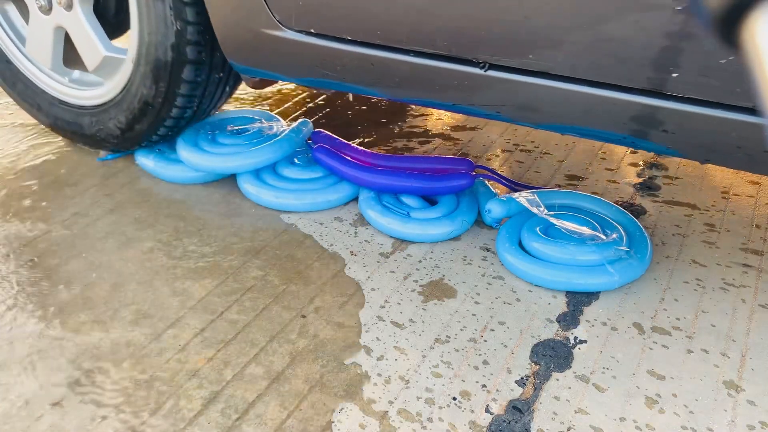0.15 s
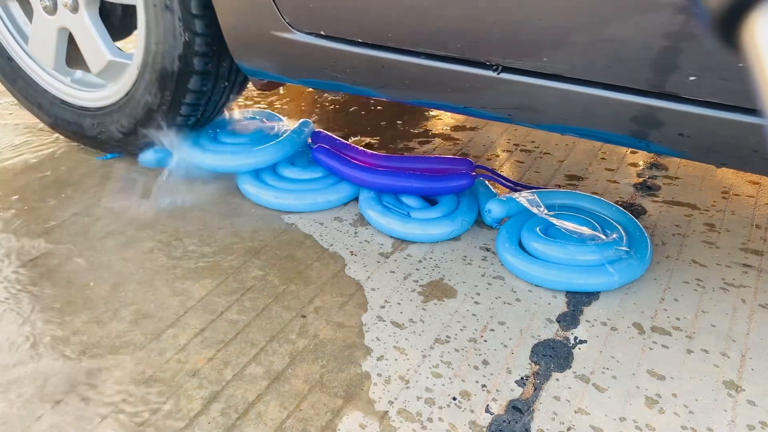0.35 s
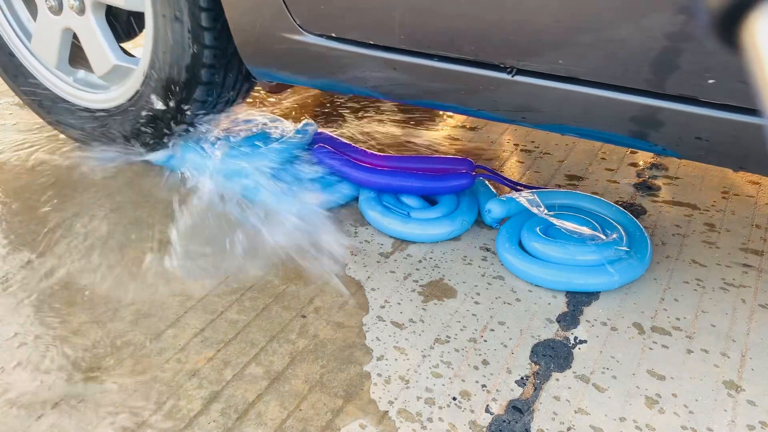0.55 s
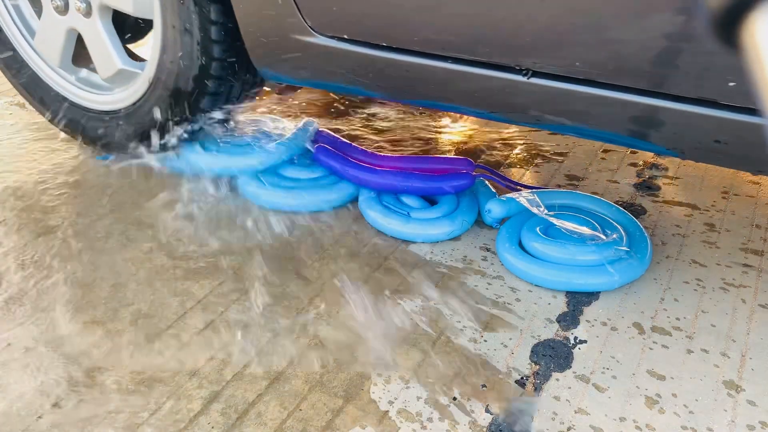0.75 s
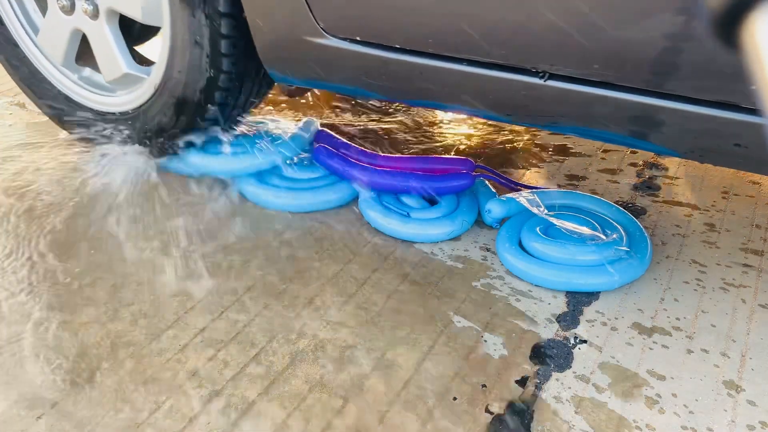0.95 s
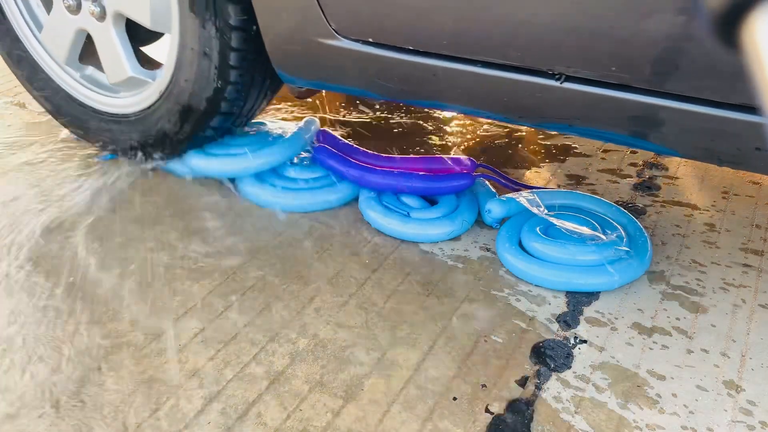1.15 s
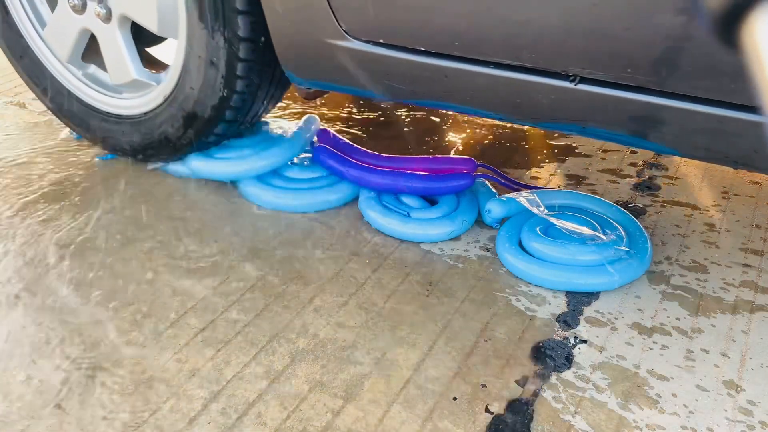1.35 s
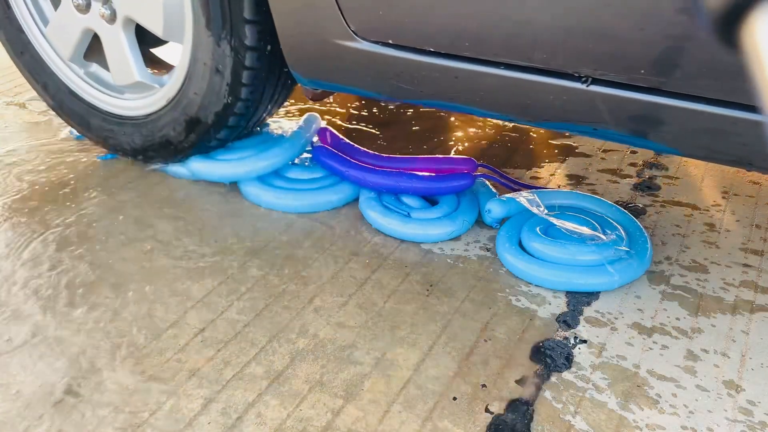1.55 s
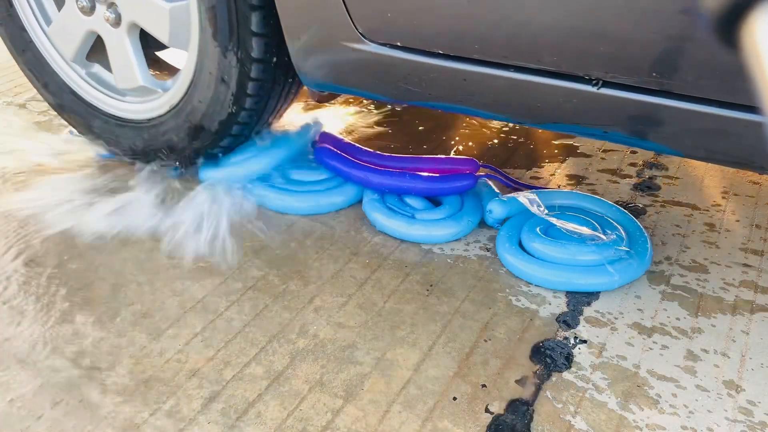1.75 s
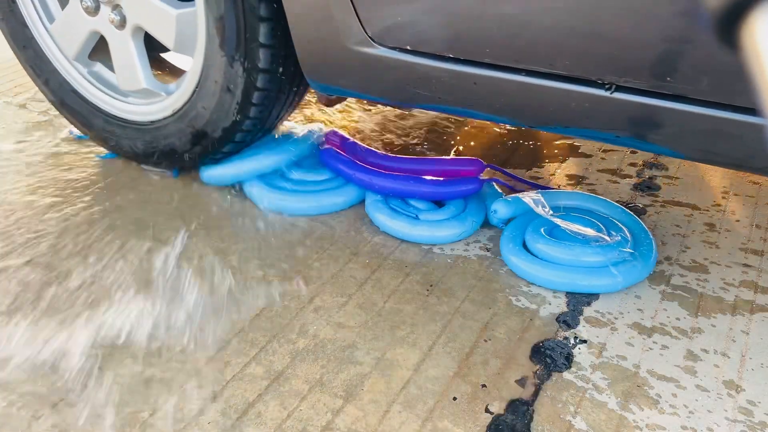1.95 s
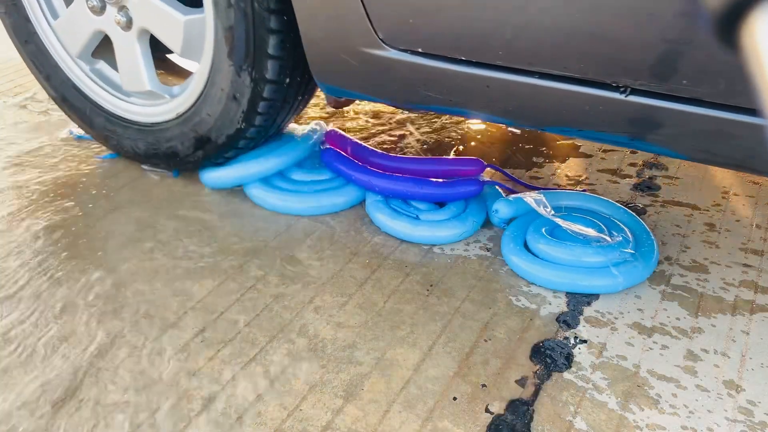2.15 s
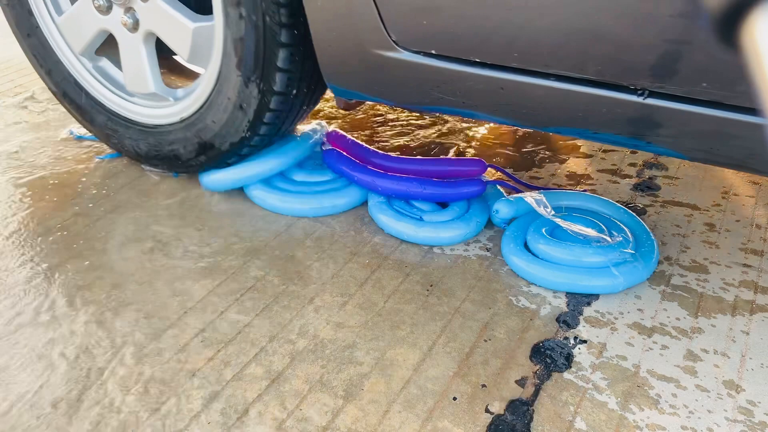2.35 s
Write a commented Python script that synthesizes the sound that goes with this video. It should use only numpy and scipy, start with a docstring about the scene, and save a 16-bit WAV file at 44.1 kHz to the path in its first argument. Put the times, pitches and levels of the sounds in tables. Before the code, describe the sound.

Water balloons burst under a slowly rolling car tire: a sharp loud pop and splash, pattering spray and drops, rubber creaking, then a softer, wetter crackling burst with gulps and a low thump; outdoors on wet concrete, close stereo microphone.

```python
"""Low rumble, faint spray and slosh, and single drops open the scene as a car tyre rolls slowly over coiled
water balloons on wet concrete. Two balloons burst: noise cracks ring damped skin tones, and noise gushes out.
Spray and slosh are dense damped sines over hiss; drops tick and ring, gulps ring with rising pitch.
Rubber creaks in rough noise puffs before the second burst; a low sine thumps after it.
A two-port microphone listens close by."""
import sys
import numpy as np
from scipy.fft import rfft, irfft, next_fast_len
from scipy.io import wavfile
from scipy.ndimage import map_coordinates

SR = 44100
rng = np.random.default_rng(int(sys.argv[2]) if len(sys.argv) > 2 else 0)


def to_wav(sig):
    """Store sig (one row per channel, or 1-D mono) as 16-bit WAV at the path in sys.argv[1].

    Samples outside -1..1 are clipped; the rate is SR.
    """
    pcm = np.clip(np.atleast_2d(sig), -1, 1) * 32767
    pcm = np.round(pcm).astype(np.int16)
    wavfile.write(sys.argv[1], SR, pcm.T)  # frames by channels


N = 105840
T = np.arange(N) / SR  # s
CREST_DB = 6  # nominal peak over rms of a noise puff

# cracks of splitting rubber: start_s, crack_peak_db, body_peak_db, pitch_share (of the full skin's)
CRACK_EVENTS = [(.2414, -2, -2, 1), (1.5578, -14, -32, 1), (1.5735, -17, -18, .6), (1.5828, -11, -12, .47),
                (1.5892, -11, -15, .7)]
# spectrum of spray and drop ticks: freq_hz, level_db
SPRAY_SPECTRUM = [(700, -23), (1400, -7), (2200, -3), (3300, -11), (4600, -4), (6200, -4.5), (7200, -8.5),
                  (9500, -15), (9750, -59)]
# spectrum of slosh and gush bass: freq_hz, level_db
SLOSH_SPECTRUM = [(90, -11.5), (200, -3.5), (500, -5.5), (1100, 1), (1600, -6), (3000, -22), (6000, -50),
                  (9500, -79)]


def amp(db):
    """Decibels to linear gain."""
    return 10 ** (np.asarray(db) / 20)


def unit(x):
    """Scale to an rms of 1."""
    return x / np.sqrt(np.mean(x ** 2) + 1e-20)


def along(points, hz):
    """Interpolate (freq_hz, value) points on a log frequency axis."""
    f, v = np.transpose(points)
    return np.interp(np.log(hz + 1), np.log(f + 1), v)


def level(rows):
    """Gain per sample from (time_s, level_db) rows."""
    return amp(np.interp(T, *np.transpose(rows)))


def wobble(rate_hz):
    """Smooth random curve through rate_hz knots a second."""
    knots = rng.standard_normal(int(N * rate_hz / SR) + 4)
    return map_coordinates(knots, [T * rate_hz])


def filtered(x, response):
    """Multiply the spectrum of x by a complex response of frequency."""
    size = next_fast_len(N + SR // 2)
    hz = np.fft.rfftfreq(size, 1 / SR)
    return irfft(rfft(x, size) * response(hz), size)[..., :N]


def coloured(x, colour):
    """Filter x by a (freq_hz, level_db) curve, to unit rms."""
    return unit(filtered(x, lambda hz: amp(along(colour, hz))))


def noise(colour):
    """Two unrelated noises of one colour."""
    return coloured(rng.standard_normal((2, N)), colour)


def shape(start_s, rise_s, hold_s, t60_s):
    """Linear attack, hold and exponential release."""
    t = T - start_s
    attack = np.clip(t / rise_s, 0, 1)
    return attack * amp(-60 * np.clip(t - rise_s - hold_s, 0, None) / t60_s)


def ring(start_s, hz, t60_s, rise_s, glide=0):
    """Damped sine whose pitch may climb by 2 * glide, as a share, over its t60."""
    t = np.clip(T - start_s, 0, t60_s)
    turns = hz * t * (1 + glide * t / t60_s)
    return shape(start_s, rise_s, 0, t60_s) * np.sin(2 * np.pi * turns)


def grains(count, hz, octaves, cycles, spread_db, rarest, size):
    """Scattered short damped sines of uneven pitch and strength, in two unrelated streams."""
    u, t = rng.random((count, 3)), np.arange(size) / SR
    turns = hz * 2 ** (octaves * rng.standard_normal((count, 1))) * t
    strength = amp(-spread_db * np.log(u[:, 1:2] + rarest))
    envelope = np.exp(-turns / cycles) * (1 - np.exp(-2 * turns))
    wave = strength * np.sin(2 * np.pi * turns) * envelope
    wave *= np.cos(np.pi / 2 * t / t[-1])  # fade to zero at the grain's end
    at = (u[:, :1] * 2 * N).astype(int) + np.arange(size)
    stream = np.bincount(at.ravel(), wave.ravel(), 2 * N + size)[:2 * N]
    return unit(stream.reshape(2, N))


def rumble():
    """Low rumble: bass noise under a changing level."""
    # time_s, level_db
    rumble_level = [(0.0, -43), (0.11, -41), (0.22, -43.5), (0.24, -42.5), (0.3, -53.5), (1.04, -48),
                    (1.06, -42.5), (1.35, -48.5), (1.45, -41), (1.54, -35.5), (1.6, -34.5), (1.66, -37),
                    (1.7, -34), (1.85, -40), (1.9, -36), (2.07, -42.5), (2.09, -36.5), (2.15, -43),
                    (2.37, -41), (2.4, -47)]
    # freq_hz, level_db
    rumble_spectrum = [(15, -24), (32, 0.5), (50, -3), (75, -12), (130, -17.5), (250, -39), (600, -82)]
    return level(rumble_level) * noise(rumble_spectrum)


def water():
    """Spray of fine drops and slosh of bubbles: many damped sines, each layer over its own hiss."""
    # time_s, level_db
    spray_level = [(0, -51), (.18, -66.5), (.24, -38), (.27, -35), (.33, -39), (.45, -35), (.6, -39.5),
                   (.71, -36.5), (.85, -35.5), (1, -39.5), (1.09, -49.5), (1.22, -55.5), (1.3, -53),
                   (1.54, -52.5), (1.6, -30.5), (1.66, -37), (1.72, -42.5), (1.8, -47), (1.9, -41),
                   (2.05, -40), (2.12, -44.5), (2.25, -48.5), (2.31, -51.5), (2.4, -55)]
    # time_s, level_db
    slosh_level = [(0, -52.5), (.11, -62), (.23, -46.5), (.28, -31), (.4, -40), (.55, -42.5), (.7, -43),
                   (.77, -51), (.81, -41), (.86, -50.5), (1, -53.5), (1.22, -58.5), (1.3, -57), (1.45, -44),
                   (1.55, -48.5), (1.6, -27), (1.66, -35.5), (1.72, -43), (1.8, -50.5), (1.9, -52.5),
                   (2.2, -57.5), (2.4, -53)]
    fine = grains(count=16000, hz=3300, octaves=.7, cycles=4, spread_db=3.3, rarest=.01, size=180)
    spray = coloured(fine + .8 * rng.standard_normal((2, N)), SPRAY_SPECTRUM)
    spray = spray * amp(1.5 * wobble(60))
    bubbles = grains(count=3500, hz=558, octaves=.897, cycles=3, spread_db=3.5, rarest=.02, size=900)
    slosh = unit(bubbles + .9 * noise(SLOSH_SPECTRUM))
    slosh = slosh * amp(1.5 * wobble(45))
    return level(spray_level) * spray + level(slosh_level) * slosh


def drops():
    """Single drops landing: a tick of broad noise with a short ring of slightly rising pitch."""
    # start_s, peak_db, pitch_hz (at the ring's start)
    drop_events = [(0.056, -40, 3370), (0.3725, -24, 2590), (0.769, -30, 3220), (0.8518, -39, 2350),
                   (0.88, -31.5, 2350), (1.1004, -35, 2250), (1.248, -40.5, 5000), (1.355, -39, 6440),
                   (1.4677, -46, 1620), (1.6344, -25.5, 3940), (1.702, -36.5, 5270), (1.7384, -33.5, 4580),
                   (1.8896, -32, 3570), (1.9756, -31, 5550), (2.0343, -33.5, 2260), (2.0707, -25.5, 2130),
                   (2.0767, -25.5, 6200), (2.1665, -38, 4500), (2.2517, -38, 4960), (2.2733, -39, 4900)]
    plink_db = -5  # ring relative to the drop's peak
    puffs = sum(amp(db - CREST_DB) * shape(s, .0011, 0, .035) for s, db, _ in drop_events)
    tick = puffs * noise(SPRAY_SPECTRUM)[0]
    plink = sum(amp(db + plink_db) * ring(s, hz, 22 / hz, .00044, glide=.059)
                for s, db, hz in drop_events)
    return tick + plink


def cracks():
    """Splitting rubber: sharp puffs of coloured noise."""
    # freq_hz, level_db
    crack_spectrum = [(300, -49), (1000, -8.5), (2500, -26), (5000, -3), (6800, -11.5), (8500, -20),
                      (9800, -49), (10600, -56)]
    rise_s, hold_s, t60_s = .0007, .0007, .009
    puffs = sum(amp(db - CREST_DB) * shape(s, rise_s, hold_s, t60_s) for s, db, *_ in CRACK_EVENTS)
    return puffs * noise(crack_spectrum)[0]


def skin():
    """Each crack rings the water-filled skin's modes; a lower pitch share rings longer."""
    # modes at full skin: freq_hz, level_db, t60_s
    skin_modes = [(194, -17, .09), (400, -18, .04), (770, -3, .026), (1110, -3, .017), (1960, -15, .014)]
    lag_s, rise_s = .0014, .0006
    body = np.zeros(N)
    for s, _, db, share in CRACK_EVENTS:
        for hz, mode_db, t60_s in skin_modes:
            gain = amp(db + mode_db + rng.normal(0, 1))
            pitch_hz = hz * share * rng.normal(1, .033)
            body += gain * ring(s + lag_s, pitch_hz, t60_s / share ** .5, rise_s)
    return body


def gushes():
    """Water leaving each burst: lumpy bass noise and rippling treble that dies faster."""
    # start_s of each gush
    gush_starts = (.2435, 1.5576)
    # treble_db, treble_rise_s, treble_hold_s, bass_rise_s, bass_t60_s, treble_t60_s, bass_over_treble_db
    gush_shapes = [(-25, .002, .004, .003, .13, .07, 3), (-22, .001, .034, .027, .25, .07, -2)]
    # treble: freq_hz, level_db
    gush_spectrum = [(700, -29.5), (1500, -4), (2500, 1), (5000, -4.5), (6500, -8.5), (8500, -16),
                     (9600, -18), (10600, -55)]
    lumpy_db, ripple_db = 2.5, 2.5  # unevenness of bass, treble
    low, high = np.zeros(N), np.zeros(N)
    for s, row in zip(gush_starts, gush_shapes):
        db, rise_s, hold_s, bass_rise_s, bass_t60_s, treble_t60_s, over_db = row
        low += amp(db + over_db) * shape(s, bass_rise_s, 0, bass_t60_s)
        high += amp(db) * shape(s, rise_s, hold_s, treble_t60_s)
    bass = low * amp(lumpy_db * wobble(150)) * noise(SLOSH_SPECTRUM)
    treble = high * amp(ripple_db * wobble(350)) * noise(gush_spectrum)
    return bass + treble


def gulps():
    """Gulps of water and air: damped sines that rise in pitch."""
    # start_s, peak_db, start_pitch_hz, t60_cycles (of the start pitch), glide (half the pitch rise, share)
    gulp_events = [(.3, -27, 510, 29, 0.23), (.332, -23.5, 700, 14, 0.24), (.378, -31.5, 830, 22, .2),
                   (.41, -37.5, 496, 14, .2), (.462, -33, 520, 21, 0.16), (0.518, -33.5, 286, 9.6, .2),
                   (.795, -41.5, 319, 32, 0.16), (0.886, -30, 1463, 50, 1.1), (1.61, -23, 535, 20, .1),
                   (1.636, -24, 478, 14, 0.11), (1.664, -22.5, 372, 25, 0.079),
                   (1.725, -34.5, 837, 18, 0.24), (2.251, -39.5, 394, 9.2, 0.11),
                   (2.351, -41.5, 950, 16, 0.24)]
    return sum(amp(db) * ring(s, hz, cycles / hz, 1.47 / hz, glide=glide)
               for s, db, hz, cycles, glide in gulp_events)


def creaks():
    """Rubber slipping under the tread in rough puffs of noise."""
    # start_s, level_db
    slips = [(1.265, -43.5), (1.288, -42), (1.316, -45), (1.347, -42), (1.395, -44.5), (1.413, -40.5),
             (1.436, -42), (1.468, -36), (1.497, -46.5), (1.511, -42), (1.533, -36.5)]
    # freq_hz, level_db
    creak_spectrum = [(150, -6.5), (400, -0.5), (1100, 4), (2200, -3.5), (5000, -14), (9500, -26),
                      (9750, -82)]
    rise_s, t60_s, rough_db = .0021, .085, 1.1
    puffs = sum(amp(db) * shape(s, rise_s, 0, t60_s) for s, db in slips)
    return puffs * amp(rough_db * wobble(290)) * noise(creak_spectrum)


def thump():
    """The wheel drops: one low damped sine, first swing negative."""
    return -amp(-19) * ring(1.688, hz=36, t60_s=.24, rise_s=.0085)


def scene():
    """Sharp sounds reach both ports alike; the diffuse ones differ partly."""
    # likeness of diffuse sound at both ports: freq_hz, correlation (0..1)
    likeness = [(40, .85), (300, .88), (1000, .75), (3000, .75), (4300, .78), (5200, .98), (9000, .99)]

    def mix(hz):
        angle = np.arccos(np.clip(along(likeness, hz), 0, 1)) / 2
        return np.array([np.cos(angle), np.sin(angle)])

    diffuse = rumble() + water() + gushes() + creaks()
    sharp = drops() + cracks() + skin() + gulps() + thump()
    mid, side = filtered(diffuse, mix)
    return sharp + np.array([mid + side, mid - side])


def record(dry):
    """Ports differ in level and phase; loudest peaks round off; nothing is kept above the band limit."""
    # freq_hz, left_lead_rad
    left_lead = [(0, 0), (3500, 6.1), (3700, 5.7), (5920, -3.14), (7480, -9.42), (10600, -21.9)]
    # freq_hz, left_over_right_db
    left_gain = [(250, 0), (600, 4.5), (1400, 1), (2000, 2), (3000, -3), (4000, 2), (5200, 0)]
    ceiling, top_hz = .93, 10690

    def port_pair(hz):
        # each port takes half the difference
        phase = np.interp(hz, *np.transpose(left_lead))
        half = amp(along(left_gain, hz) / 2) * np.exp(.5j * phase)
        return np.array([half, 1 / half])

    ports = filtered(dry, port_pair)
    rounded = ports / (1 + np.abs(ports / ceiling) ** 6) ** (1 / 6)
    return filtered(rounded, lambda hz: hz < top_hz)


dry = scene()
out = record(dry)
to_wav(out)
```